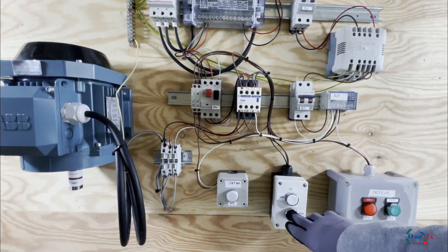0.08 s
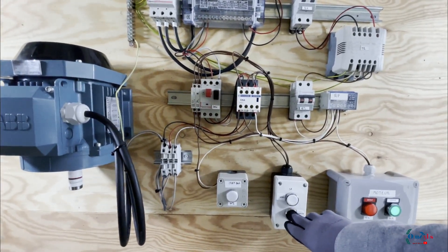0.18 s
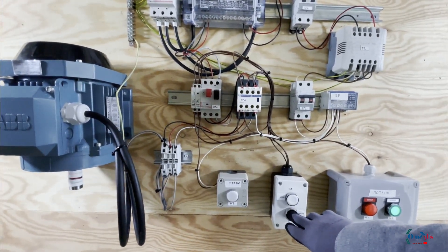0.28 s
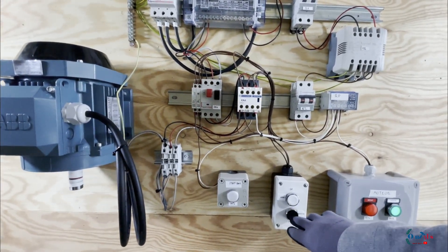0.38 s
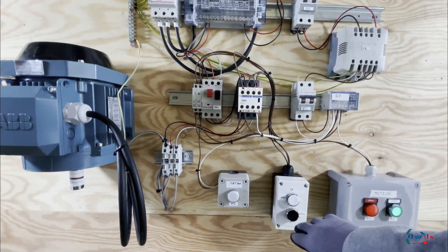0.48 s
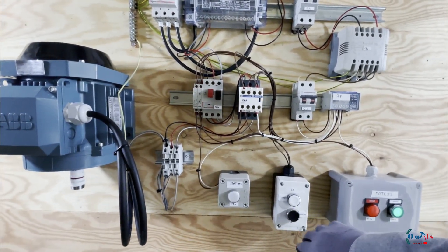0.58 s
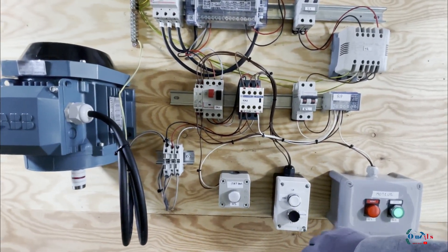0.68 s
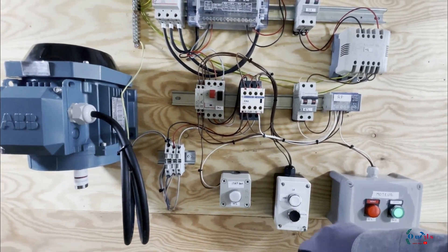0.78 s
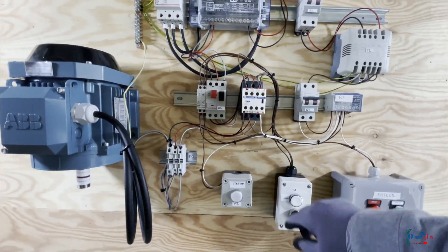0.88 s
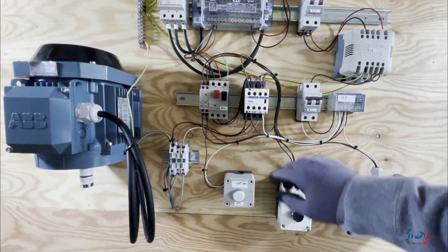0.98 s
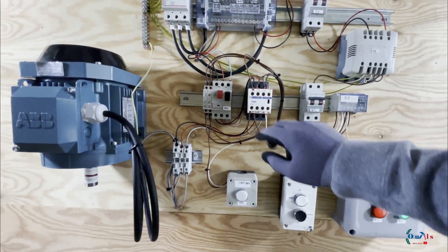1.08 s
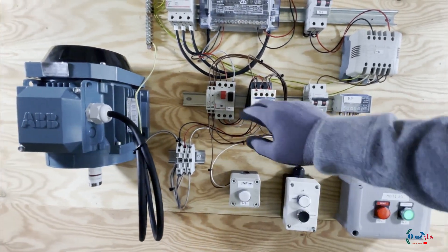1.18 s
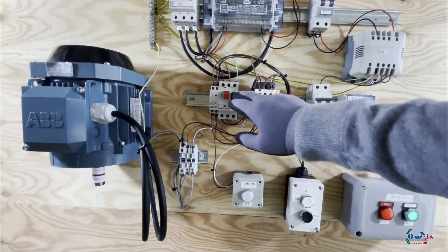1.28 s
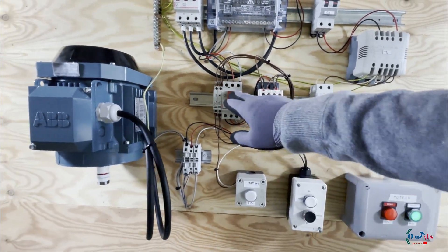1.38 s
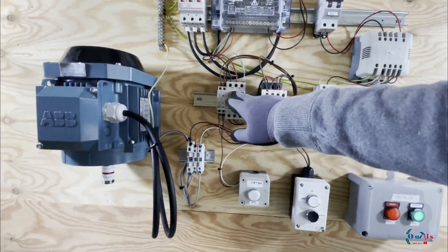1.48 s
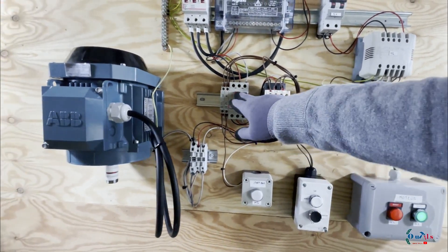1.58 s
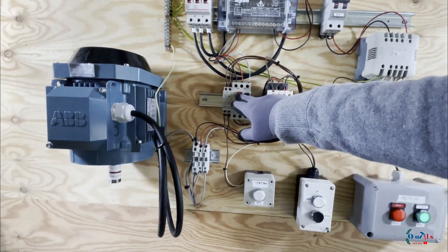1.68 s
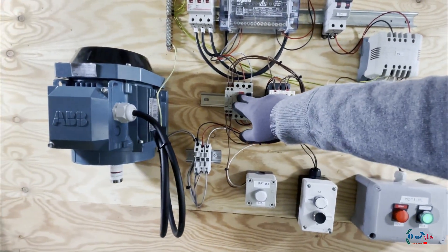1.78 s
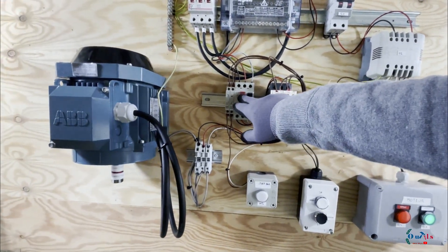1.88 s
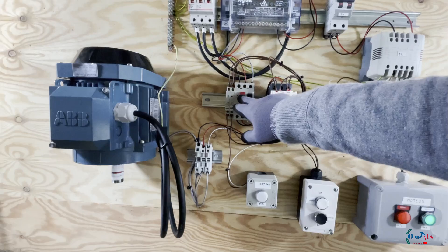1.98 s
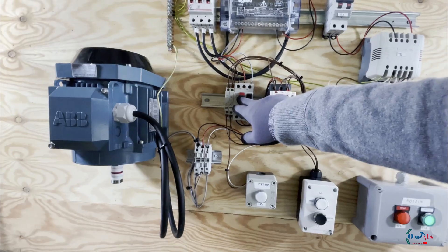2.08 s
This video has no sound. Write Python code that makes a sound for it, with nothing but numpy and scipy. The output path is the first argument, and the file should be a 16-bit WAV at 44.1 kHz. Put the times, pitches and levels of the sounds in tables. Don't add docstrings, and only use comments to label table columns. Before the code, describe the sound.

An electric motor starts on a plywood board in a quiet workshop. Faint air noise, a tiny button tick at 0.12 seconds, then a loud, bright, chattering contactor slam at 0.22 with short room echoes. From 0.3 to 0.5 heavy low wooden thumps and buzzing loose parts; weak knocks fade by 0.8. A steady hum with a thin whine and soft fan rush continues to the end, close stereo.

```python
import sys
import numpy as np
from scipy import signal
from scipy.fft import rfft, irfft
from scipy.io import wavfile
from scipy.ndimage import uniform_filter1d

SR = 44100
rng = np.random.default_rng(int(sys.argv[2]) if len(sys.argv) > 2 else 0)


def ratio(d):
    e = np.asarray(d, float) / 20
    return 10 ** e


def store_wav(level_fs):
    pcm = np.round(np.clip(np.atleast_2d(level_fs), -1, 1) * 32767)
    wavfile.write(sys.argv[1], SR, pcm.T.astype(np.int16))


N = 94815
T = np.arange(N) / SR
HZ = np.arange(N // 2 + 1) * SR / N

# frequency [Hz], level [dB], t60 [s].
HOUSING_MODES = [(1700, -10, .01), (2160, -2, .022), (3050, -4, .012), (3680, -5, .012), (4770, -6, .01),
                 (5500, -2, .012), (5950, 1, .016), (6550, -8, .008), (7580, -1, .014), (7910, -2, .012),
                 (8700, -4, .008), (9930, -3, .01), (10700, -6, .008), (11600, -11, .008)]
# start [s], level [dB], chatter length [ms], lowest frequency [Hz].
STRIKES = [
    (.1205, -33, 4.5, 1800),
    (.2168, -5, 2.2, 9500),
    (.2203, 6, 3.2, 1200),
    (.2243, 6, 3.8, 1200),
    (.401, -23, 4.5, 9000),
    (.4205, -18, 1.8, 3000),
    (.2435, -24, 3.5, 3000),
    (.355, -33, 12, 2500),
]
# frequency [Hz], level [dB], t60 [s].
BOARD_MODES = [(53.6, -12, 0.11), (70, -5, 0.19), (99.7, 2.5, 0.1), (126.9, -1, 0.2), (156.4, -3, 0.13),
               (205.2, -5, 0.077), (260.7, -7.5, 0.16), (308, -5.5, 0.0596), (391.4, -10, 0.088),
               (530, -11, 0.044), (711, -3, 0.054), (883, -7.5, 0.047), (1010, -5.5, 0.027)]
# start [s], level [dB], push length [ms].
JOLTS = [(0.213, -14.5, 2.6), (0.228, -7.5, 3.5), (.243, -13.5, 0.55), (0.258, -13, 5.9),
         (.272, -17.5, 0.45), (0.296, -12, 2.2), (.322, -7.5, 1.8), (0.337, -3, 2.8), (.349, -7.5, 0.69),
         (.365, -1, 3.9), (.378, -5.5, 0.3), (0.393, -1.5, 1.5), (0.407, -3, 2.8), (0.423, -3.5, 1.64),
         (.433, -12, 2.7), (0.454, -5.5, 1.6), (0.472, -10.5, 7.5), (.49, -4.5, 4.5), (0.546, -35, 2.2),
         (0.574, -17.5, 5.3), (.6, -42.5, 13), (.638, -18, 2.7), (.7, -19, 4.5), (0.773, -17, 3.9)]
# start [s], level [dB].
RAIL_KNOCKS = [
    (.243, -18.5),
    (.27, -25),
]
# frequency [Hz], level [dB], t60 [s].
RAIL_MODES = [(810, -18, 0.067), (816, 8, 0.15), (903, 3.5, 0.17)]
# frequency [Hz], density [dB per Hz].
SHUDDER_SPECTRUM = [(300, -14.5), (700, 10), (2000, 1.5), (4500, -2), (7000, -9), (11500, -7.5),
                    (14000, -38)]
SHAFT_ORDERS = [4, 5, 8, 11, 12, 27, 30, 34, 35, 38, 56, 70, 82, 130, 140.6, 178]
# level [dB], pan [dB].
TONES = [(-34.5, -2), (-40, -1), (-42, -4), (-47, -4), (-43, -9.5), (-54, 0), (-49, -3), (-30.5, -9.5),
         (-44, -21), (-48, -2), (-53, 0), (-40, 3.5), (-46, 1), (-57.5, 22), (-64.5, 15), (-46.5, -8)]
# frequency [Hz], density [dB per Hz].
FAN_SPECTRUM = [(24, -39), (40, 4.5), (107, -3.5), (579, -14), (854, -7), (1050, -16), (2500, -21.5),
                (3860, -21), (9400, -37.5), (12200, -69), (20700, -120)]
# frequency
# [Hz], width [Hz], lift [dB].
MOTOR_RUSH_LIFTS = [(820, 260, 1.5), (1395, 106, 8), (1790, 840, 6.5), (3650, 2030, 8.5), (8950, 1040, 15),
                    (10660, 770, 17), (3150, 140, -9.5)]
# frequency [Hz], density [dB per Hz].
SHOP_SPECTRUM = [(24, -33), (40, 2.5), (358, -11), (393, -15), (450, -19.5), (1770, -29.5), (2500, -39),
                 (3360, -27), (9400, -49.5), (12200, -79), (20700, -120)]
# frequency [Hz],
# width [Hz], lift [dB].
SHOP_LIFTS = [(1960, 780, 18.5), (3800, 1800, 9.5), (8750, 1400, 20)]
# frequency [Hz], share of power common to both [ratio].
LIKENESS = [(60, 0.97), (250, 0.82), (600, 0.29), (1500, 0.36), (4000, 0.27), (9000, 0.12)]
# frequency [Hz], left over right [dB].
LEFT_LIFT = [(100, 2.1), (500, 5.5), (1700, 3.5), (3500, 4), (7000, 18.5), (11500, -11)]
# start [s], end [s].
WIDE_OPEN_S = [
    (.208, .254),
    (.39, .438),
]

START_S, RUN_UP_S, SHAFT_HZ = 0.222, 0.23, 24.98
MOTOR_PAN_DB, MOTOR_LAG_S = -1.24, 0.0003


def table(rows, hz):
    rows = np.array(rows, float)
    return np.interp(np.log(hz + 1), np.log(rows[:, 0] + 1), rows[:, 1])


def unit(x):
    return x / np.sqrt(np.mean(x ** 2))


def add(out, x, start_s):
    i = int(start_s * SR)
    out[i:i + len(x)] += x[:N - i]


def add_hit(out, hit, start_s, peak_db):
    add(out, ratio(peak_db) * hit / abs(hit).max(), start_s)


def walk(rate_hz):
    hold = int(SR / rate_hz)
    steps = np.repeat(rng.standard_normal(100)[:N // hold + 1], hold)[:N]
    return 1.285 * uniform_filter1d(uniform_filter1d(steps, hold), hold)


def ports(x, pan_db, lag_s):
    late = irfft(rfft(x) * np.exp(-2j * np.pi * HZ * lag_s), N)
    return np.array([x * ratio(pan_db / 2), late * ratio(-pan_db / 2)])


def ring(modes, length_s, spread_db):
    t = T[:int(length_s * SR)]
    m = np.array(modes, float)
    hz, level_db, t60_s = m[:, :1], m[:, 1], m[:, 2:]
    gain = ratio(level_db + spread_db * rng.standard_normal(len(m))) * rng.choice([-1, 1], len(m))
    return gain @ (np.sin(2 * np.pi * hz * t) * np.exp(-np.log(1000) * t / t60_s))


def colour(rows, lifts):
    top_hz, fall_db_per_khz = 8540, 1.5
    broad = table(rows, np.minimum(HZ, top_hz))
    broad = broad - fall_db_per_khz * np.clip(HZ - top_hz, 0, None) / 1000
    return broad + sum(db / (1 + (2 * (HZ - hz) / width_hz) ** 2) for hz, width_hz, db in lifts)


def rush(spectrum_db, pan_db, flicker_db):
    like = np.clip(table(LIKENESS, HZ), 0, 1)
    common = ports(rng.standard_normal(N), 0, MOTOR_LAG_S)
    own = rng.standard_normal((2, N))
    spec = ratio(spectrum_db) * (np.sqrt(like) * rfft(common) + np.sqrt(1 - like) * rfft(own))
    octave = np.log2(HZ + 1)
    total = np.zeros((2, N))
    for centre in range(4, 15):
        band = irfft(spec * np.clip(1 - abs(octave - centre), 0, 1), N)
        total += band * ratio(flicker_db * walk(9))
    return unit(total) * ratio(np.array([[pan_db], [-pan_db]]) / 2)


def contactor():
    chatter_per_s, crack_db, crack_decay_s, ring_share = 7000, 4, 0.0005, 0.7
    out = np.zeros(N)
    modes = np.array(HOUSING_MODES) * [1, 1, ring_share]
    t = T[:1000]
    for start_s, db, chatter_ms, low_hz in STRIKES:
        taps = rng.standard_normal(len(t)) * (rng.random(len(t)) < chatter_per_s / SR)
        taps = taps * np.exp(-(t / (chatter_ms / 1000)) ** 4)
        taps[0] = 1
        crack = rng.standard_normal(300) * np.exp(-T[:300] / crack_decay_s) * ratio(crack_db)
        body = ring(modes, 0.05, 1)
        add(body, crack, 0)
        high_pass = signal.butter(4, low_hz, "high", fs=SR, output="sos")
        add_hit(out, signal.sosfilt(high_pass, signal.fftconvolve(taps, body)), start_s, db)
    return out


def board():
    rock_hz, rock_width_hz, rock_db, rock_t60_s = 67.2, 31, -19, 3.6
    out = np.zeros(N)
    for start_s, db, push_ms in JOLTS:
        push = np.hanning(max(int(push_ms * SR / 1000), 4))
        add_hit(out, signal.fftconvolve(push, ring(BOARD_MODES, 0.55, 3.9)), start_s, db)
    resonance = 1 + (2 * (HZ - rock_hz) / rock_width_hz) ** 2
    sway = unit(irfft(rfft(rng.standard_normal(N)) / resonance, N))
    since = T - START_S
    return out + sway * ratio(rock_db - 60 * since / rock_t60_s) * np.clip(since / RUN_UP_S, 0, 1)


def rail():
    out = np.zeros(N)
    shove = np.hanning(200) * np.sin(2 * np.pi * 840 * T[:200])
    for start_s, db in RAIL_KNOCKS:
        add_hit(out, signal.fftconvolve(shove, ring(RAIL_MODES, 0.2, 1.5)), start_s, db)
    return out


def motor():
    sing_s, sing_rise_s, wander_db = 0.432, 0.02, 1.2
    rush_db, rush_rise_s, swell_db_per_s = -29, 0.056, 1
    turn = 2 * np.pi * SHAFT_HZ * T
    tones = np.zeros((2, N))
    for order, (db, pan_db) in zip(SHAFT_ORDERS, TONES):
        level = ratio(db + wander_db * walk(12))
        tone = level * np.sin(order * turn + rng.uniform(0, 2 * np.pi))
        tones += ports(tone, pan_db, MOTOR_LAG_S)
    tones = np.sqrt(2) * tones * np.clip((T - sing_s) / sing_rise_s, 0, 1)
    spin_up = 1 - np.exp(-np.clip(T - START_S, 0, None) / rush_rise_s)
    air = rush(colour(FAN_SPECTRUM, MOTOR_RUSH_LIFTS), MOTOR_PAN_DB, 0.27) * ratio(rush_db) * spin_up
    return (tones + air) * ratio(swell_db_per_s * (T - 1.5))


def shudder():
    peak_s, width_s, level_db = 0.378, 0.063, -26.5
    strain = np.exp(-((T - peak_s) / width_s) ** 2)
    return rush(table(SHUDDER_SPECTRUM, HZ), 0.1, 2.0) * ratio(level_db) * strain


def room(x):
    t60_s, early_db, early_t60_s, rise_s = 0.8, 5, 0.12, 0.0037
    low_hz, top_hz = 2570, 11400
    t = T[:SR]
    fade = ratio(-60 * t / t60_s) + ratio(early_db - 60 * t / early_t60_s)
    tail = rng.standard_normal((2, SR)) * fade * np.clip(t / rise_s, 0, 1)
    tail = signal.sosfilt(signal.butter(2, [low_hz, top_hz], "band", fs=SR, output="sos"), tail)
    tail = tail / np.sqrt((tail ** 2).sum(axis=1, keepdims=True))
    return signal.fftconvolve(x[None], tail, axes=1)[:, :N]


def workshop():
    return rush(colour(SHOP_SPECTRUM, SHOP_LIFTS), -2.4, 0.27) * ratio(-36.5)


def scene():
    clack = contactor()
    strike = ports(clack, -2.5, 0.00007) + ratio(-10) * room(clack)
    wood = ports(board(), -0.34, 0.00004) + ports(rail(), 4.9, MOTOR_LAG_S)
    return strike + wood + motor() + shudder() + workshop()


def microphones(dry):
    low_hz, top_hz, ceiling = 44.3, 13800, 1.0
    lift = ratio(table(LEFT_LIFT, HZ) / 2)
    ends = (1 + (low_hz / (HZ + 1)) ** 4) * (1 + (HZ / top_hz) ** 8)
    return np.clip(irfft(rfft(dry) * np.array([lift, 1 / lift]) / ends, N), -ceiling, ceiling)


def thin_treble(x):
    mid_top_hz, strip_low_hz, strip_top_hz, side_top_hz = 9700, 10950, 11650, 11250
    strip_ends_s = 1.28
    is_open = sum(1.0 * ((T > a) & (T < b)) for a, b in WIDE_OPEN_S)
    calm = x * (1 - uniform_filter1d(is_open, size=200))
    mid, side = rfft(calm[0] + calm[1]) / 2, rfft(calm[0] - calm[1]) / 2
    strip = irfft(mid * ((HZ > strip_low_hz) & (HZ < strip_top_hz)), N)
    lost_mid = irfft(mid * (HZ > mid_top_hz), N) - strip * np.clip((strip_ends_s - T) * 50, 0, 1)
    lost_side = irfft(side * (HZ > side_top_hz), N)
    return x - np.array([lost_mid + lost_side, lost_mid - lost_side])


def band_limit(x):
    return signal.sosfilt(signal.butter(12, 20000, fs=SR, output="sos"), x)


def record(dry):
    mix = thin_treble(microphones(dry))
    return band_limit(mix)


dry = scene()
out = record(dry)
store_wav(out)
```